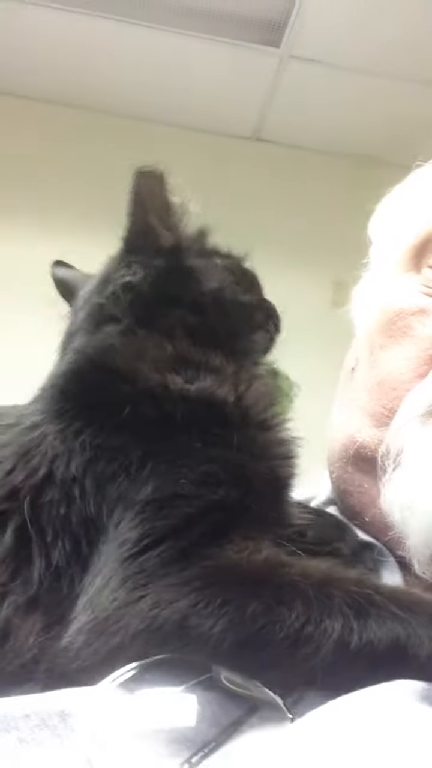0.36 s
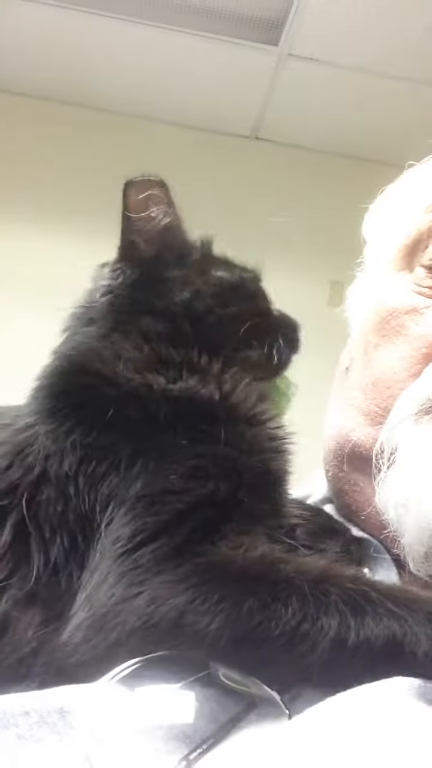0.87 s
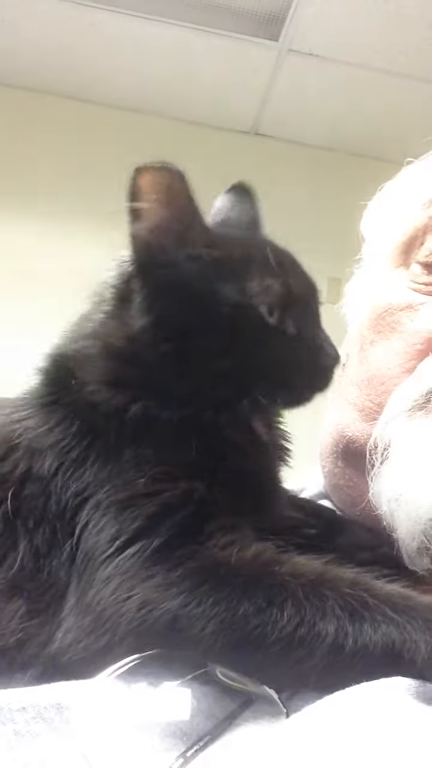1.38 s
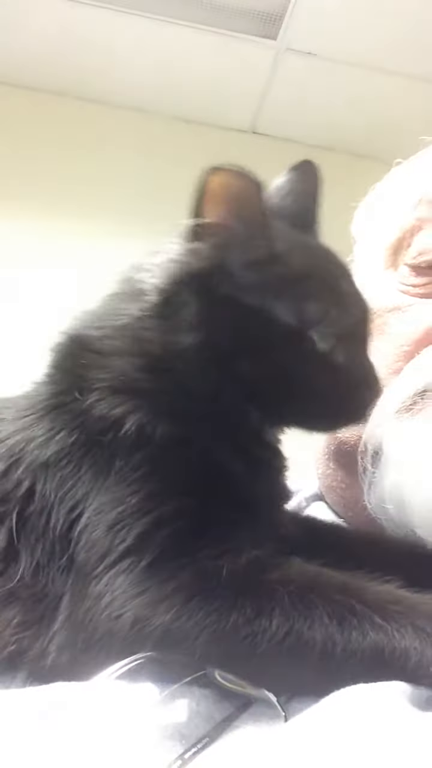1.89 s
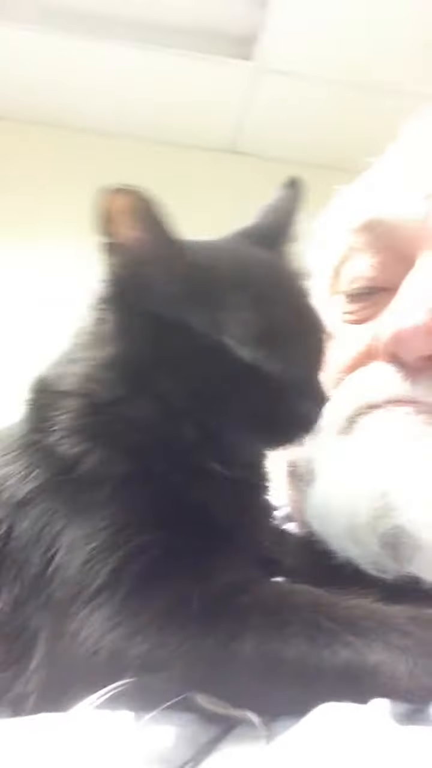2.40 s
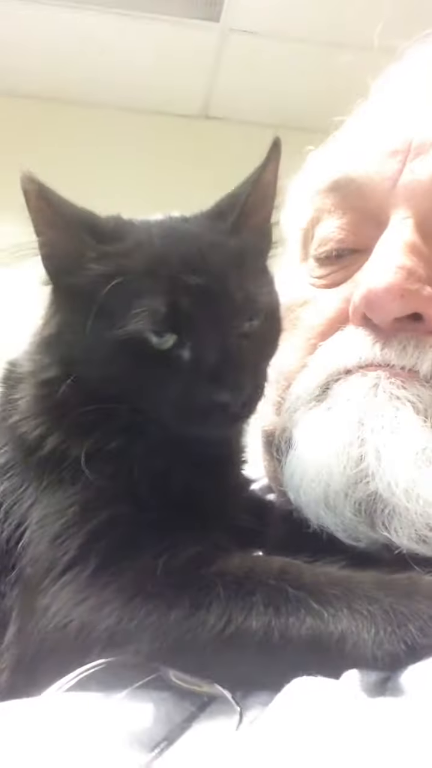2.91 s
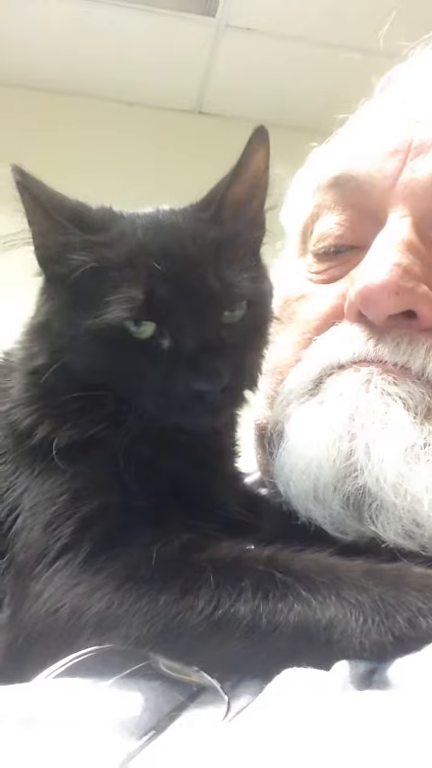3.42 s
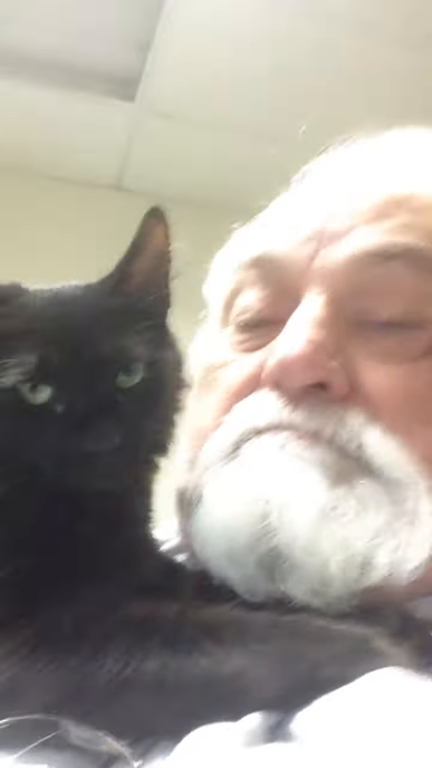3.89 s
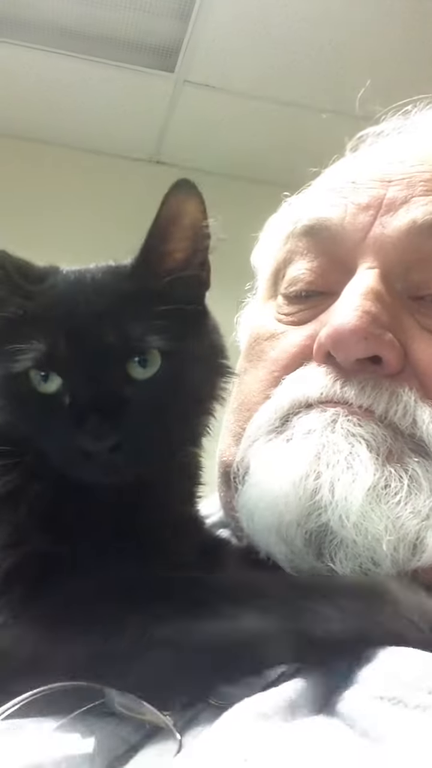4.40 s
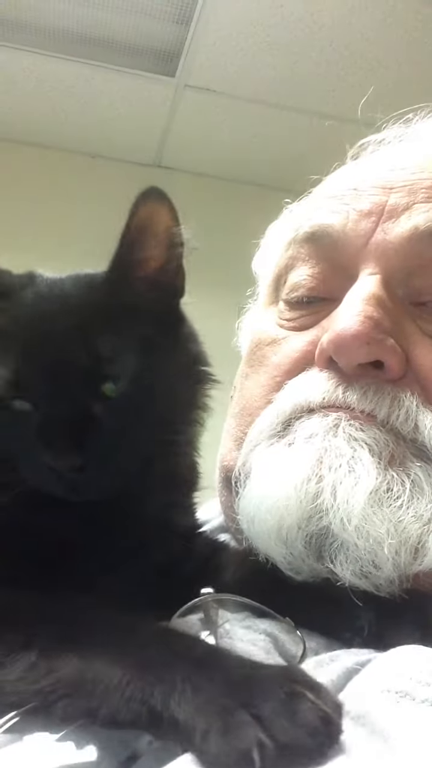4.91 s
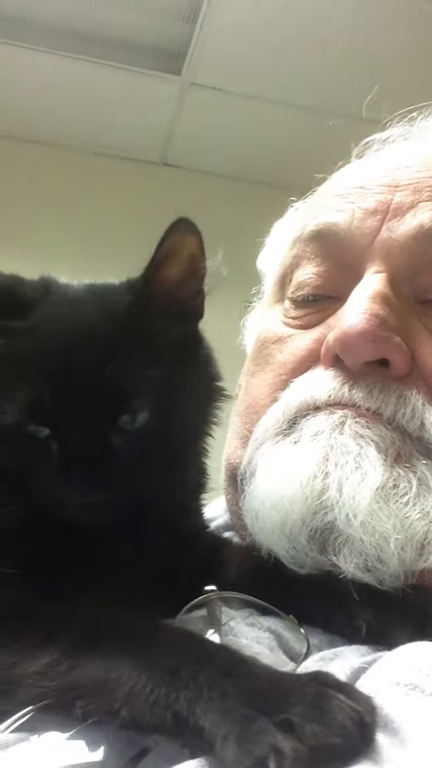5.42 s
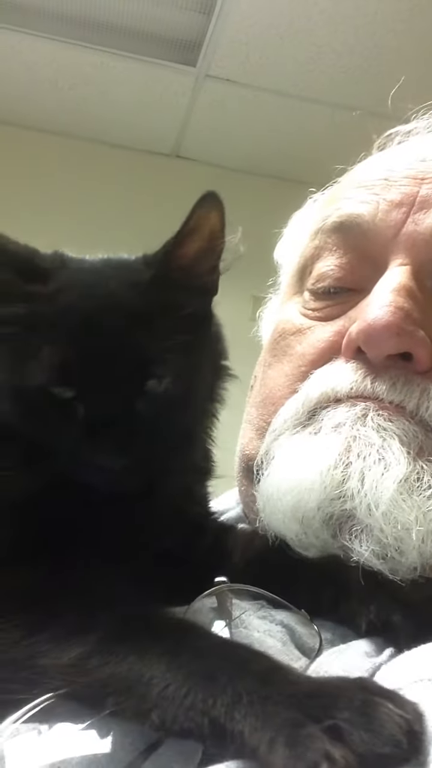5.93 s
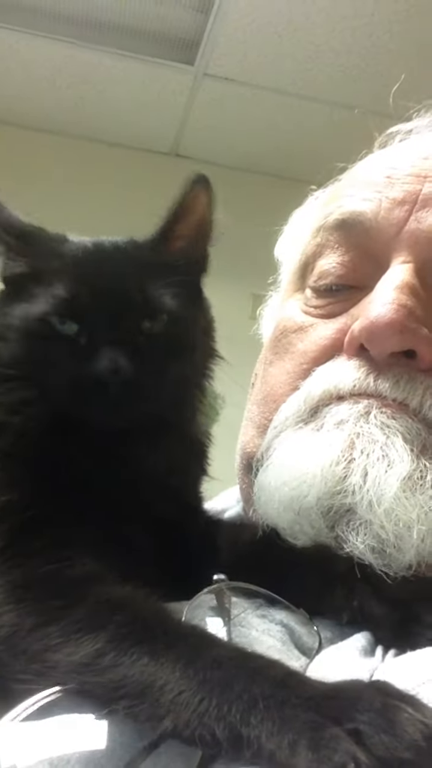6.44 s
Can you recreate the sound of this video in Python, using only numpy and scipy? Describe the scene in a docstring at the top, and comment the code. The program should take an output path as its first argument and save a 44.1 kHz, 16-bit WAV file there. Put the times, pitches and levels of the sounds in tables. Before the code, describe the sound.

A cat purrs steadily and low in a quiet room over a soft ventilation hum, with faint fur rustles and two small dry clicks midway.

```python
"""A slow machine turning 11 times a second makes a purr-like throb: each turn repeats the same gliding tone
bursts, under a steady drone. A motor hum of two beating sines and a mains buzz lie below it.
A cat on a blanket moves its head in a quiet room: fur rustles faintly (bright noise swells), with a few small
dry clicks close by (noise bursts over a hollow ring) and a thin squeak (gliding sines).
Ventilation air (shaped noise) rings the room's low modes (narrow noise bands)."""
import sys
import numpy as np
from scipy import signal
from scipy.fft import rfft, irfft
from scipy.io import wavfile

SR = 44100
rng = np.random.default_rng(int(sys.argv[2]) if len(sys.argv) > 2 else 0)


def field_ratio(decibels):
    """Amplitude ratio for a level in dB (20 dB per decade); scalars and array-likes work."""
    return 10 ** (np.asarray(decibels, dtype=float) / 20)


def put_to_file(sound):
    """Save the sound as 16-bit audio at rate SR, in the file named by the first command-line argument."""
    columns = np.atleast_2d(sound).T  # one column per channel
    safe = np.clip(columns, -1, 1)
    whole_steps = np.round(safe * 32767)
    wavfile.write(sys.argv[1], SR, whole_steps.astype(np.int16))


N = 288855


def in_time(rows):
    """A curve of (time_s, value) read at every sample."""
    return np.interp(np.arange(N) / SR, *np.transpose(rows))


def coloured_noise(gain_at):
    """White noise of 0 dB per Hz, filtered by a gain given as a function of Hz."""
    hz = np.maximum(np.arange(N // 2 + 1) * SR / N, 1)
    white = rfft(rng.standard_normal(N))
    return irfft(white * gain_at(hz), N) * np.sqrt(SR / 2)


def spectrum(points):
    """Gain along straight dB lines on a log-frequency axis."""
    hz, db = np.transpose(points)
    return lambda f: field_ratio(np.interp(np.log(f), np.log(hz), db))


def drift(corner_hz):
    """Low-passed random curve of spread 1."""
    curve = coloured_noise(lambda f: 1 / (1 + (f / corner_hz) ** 2))
    return curve / curve.std()


def tone(hz, turns=0):
    """A sine of rms 1, with a phase in turns."""
    return np.sqrt(2) * np.cos(2 * np.pi * (hz * np.arange(N) / SR + turns))


# Gliding strokes within one turn, levels before the machine gain:
# (moment_turns, pitch_hz, glide_hz_per_turn, bell_sigma_turns, peak_db)
MACHINE_STROKES = [(.522, 41.7, -27, .45, -65.8), (.118, 89.8, -53, .45, -63.7),
                   (.584, 138.9, 12, .45, -55.8), (.327, 170.3, -70, .16, -49.7),
                   (.694, 205.4, 62, .33, -50), (.122, 216.3, -238, .45, -52.2),
                   (.884, 238.9, -72, .25, -52), (.322, 292.9, -30, .45, -53.4),
                   (.863, 315.4, 53, .3, -45.9), (.173, 374.7, -98, .35, -59.4)]


def machine(waver_db):
    """Every turn repeats the same bell-shaped tone bursts, which glide in pitch and overlap the next turn."""
    turn_hz, turn_sag_hz_per_s, start_turns = 11.1898, .00077, -.002
    gain_db = 0.73
    t = np.arange(N) / SR
    turn = np.arange(2001) / 2000
    one_turn = 0
    for moment_turns, pitch_hz, glide, sigma_turns, peak_db in MACHINE_STROKES:
        nearest = (turn - moment_turns + .5) % 1 - .5
        since = nearest + np.array([[-1], [0], [1]])   # the same stroke in neighbouring turns
        bell = np.exp(-.5 * (since / sigma_turns) ** 2)
        cycles = (pitch_hz + glide * since / 2) * since / turn_hz
        one_turn = one_turn - field_ratio(peak_db) * np.sum(bell * np.cos(2 * np.pi * cycles), axis=0)
    turns = start_turns + turn_hz * t - turn_sag_hz_per_s * t ** 2 / 2
    throb = np.interp(turns % 1, turn, one_turn)
    return field_ratio(gain_db + waver_db * drift(1.3)) * throb


# Machine drone, level of the fundamental: (time_s, level_db_rms, pitch_hz)
DRONE_CURVE = [(0, -59.5, 285.51), (1.5, -59, 285.32), (3, -58.5, 285.31), (3.7, -61.5, 285.14),
               (6.55, -60.5, 285.23)]


def drone():
    """Steady tone and octave halfway between two turn partials: every second turn sounds a little different."""
    octave_db, start_turns = -19, .86
    time_s, level_db, pitch_hz = np.transpose(DRONE_CURVE)
    t = np.arange(N) / SR
    cycles = np.cumsum(np.interp(t, time_s, pitch_hz)) / SR
    pair = tone(0, cycles + start_turns) + field_ratio(octave_db) * tone(0, 2 * cycles)
    return field_ratio(np.interp(t, time_s, level_db)) * pair


# Motor hum: (time_s, level_db_rms)
HUM_CURVE = [(0, -50), (1, -49.5), (2, -49.5), (3, -50), (3.5, -52), (4, -51), (4.5, -51), (5, -49.5),
             (5.6, -49), (6.55, -48.5)]


def motor():
    """A pure low hum swells and sinks slowly; a weaker tone just below beats with it."""
    hum_hz, beat_hz, beat_db_rms = 58.73, 56.18, -66
    return field_ratio(in_time(HUM_CURVE)) * tone(hum_hz, 0.69) + field_ratio(beat_db_rms) * tone(beat_hz, 0.8)


# Mains buzz: (time_s, level_db_rms)
BUZZ_CURVE = [(0, -60.5), (1, -61), (2.6, -65), (3.5, -78), (4.1, -62), (4.5, -80), (5, -75), (6.55, -62.5)]


def mains_buzz():
    """One sine above the hum, fading in and out."""
    return field_ratio(in_time(BUZZ_CURVE)) * tone(120.1)


# Fur noise shape, relative: (freq_hz, level_db_per_hz)
FUR_SPECTRUM = [(1500, -16), (3000, 0), (6500, 0.5), (9000, -6), (14000, -5)]
# Fur brushing on cloth and hair: (peak_s, peak_db_rms, length_s)
FUR_BRUSHES = [(.15, -85, .04), (0.38, -74, .08), (1.38, -87, .06), (1.752, -81, .07), (2.025, -78, .14),
               (2.16, -79, 0.11), (2.348, -83, 0.24), (2.66, -83, 0.13), (3.05, -83, .15), (4.5, -89, .2),
               (4.85, -88, .1), (6.0, -82.5, 0.23)]


def fur(grain_db):
    """Bright noise, slightly grainy as single hairs slip; each brush swells to its peak and lets go."""
    drop_db, release_share, rest_db = 13, .8, -99   # drop_db: fall one length before the peak
    hiss = coloured_noise(spectrum(FUR_SPECTRUM)) * field_ratio(grain_db * drift(150))
    t = np.arange(N) / SR
    power = field_ratio(rest_db) ** 2
    for peak_s, peak_db, length_s in FUR_BRUSHES:
        away = (t - peak_s) / np.where(t < peak_s, length_s, release_share * length_s)
        power = power + field_ratio(peak_db - drop_db * np.minimum(away ** 2, 9)) ** 2
    return np.sqrt(power) * hiss / hiss.std()


# Hollow body ring, relative levels: (pitch_hz, level_db, t60_s)
KNOCK_MODES = [(96, -0.5, 0.07), (587, -1, 0.036), (970, -14, .03)]


def hollow_knock(t):
    """A hollow body's modes ring together, each decaying exponentially."""
    return sum(np.sin(2 * np.pi * hz * t) * field_ratio(db - 60 * t / t60_s) for hz, db, t60_s in KNOCK_MODES)


# Dry clicks; knock_db scales the hollow ring: (start_s, peak_db, low_hz, high_hz, knock_db)
DRY_CLICKS = [(3.5773, -61, 2500, 6000, -78), (3.932, -46, 1500, 18000, -43.5),
              (4.4312, -69, 9000, 15000, -90), (4.4734, -46.5, 2800, 8440, -75)]


def clicks():
    """Each click is a burst of bright noise dying in milliseconds over the short ring of a hollow body."""
    rise_s, t60_s, snap_delay_s = 0.00034, 0.01, .0004
    out = np.zeros(N)
    t = np.arange(4000) / SR
    knock = hollow_knock(t)
    for start_s, peak_db, low_hz, high_hz, knock_db in DRY_CLICKS:
        burst = rng.standard_normal(len(t)) * np.minimum(t / rise_s, 1) * field_ratio(-60 * t / t60_s)
        burst[round(snap_delay_s * SR)] = 8.5   # one sharp snap stands out of the burst
        band = signal.butter(2, [low_hz, min(high_hz, .45 * SR)], "band", fs=SR, output="sos")
        burst = signal.sosfilt(band, burst)
        start = round(start_s * SR)
        out[start:start + len(t)] += field_ratio(peak_db) * burst / abs(burst).max() - field_ratio(knock_db) * knock
    return out


# Squeak steps: (start_s, end_s, first_hz, last_hz, peak_db)
SQUEAK_STEPS = [(.865, .905, 8600, 9000, -86.5), (.912, .935, 10300, 10800, -85.5),
                (.945, .98, 11200, 11400, -86.5)]


def squeak():
    """A very faint thin whistle climbs in three steps, each a gliding sine under a half-sine swell."""
    out = np.zeros(N)
    t = np.arange(N) / SR
    for start_s, end_s, first_hz, last_hz, peak_db in SQUEAK_STEPS:
        share = np.clip((t - start_s) / (end_s - start_s), 0, 1)
        cycles = (end_s - start_s) * (first_hz * share + (last_hz - first_hz) * share ** 2 / 2)
        out += field_ratio(peak_db) * np.sin(np.pi * share) * np.sin(2 * np.pi * cycles)
    return out


# Room modes, levels before the flutter: (center_hz, width_hz, level_db_rms)
MODES = [(113, 4.6, -67.5), (118.8, 2.7, -72.5), (148, 4.3, -66.5), (177.6, 17, -60.5), (219.1, 6.7, -61.5),
         (277.2, 6, -68.5), (373, 13, -72.5), (438, 17, -80), (516, 25, -77.5), (655.6, 16, -76.5),
         (738, 30, -80.5), (842, 33, -83.5), (1060, 30, -86.5), (1165, 30, -83), (1326, 100, -81.5),
         (1569, 82, -81.5), (1916, 40, -83), (2450, 400, -86), (3580, 360, -92), (3850, 40, -96),
         (4780, 27, -101)]


def room_modes():
    """Air noise rings each narrow room mode: noise under a bell of full width at half amplitude."""
    out = np.zeros(N)
    for center_hz, width_hz, level_db in MODES:
        mode = coloured_noise(lambda f: 1 / (1 + (2 * (f - center_hz) / width_hz) ** 2))
        out += field_ratio(level_db) * mode / np.sqrt(np.pi * width_hz / 4)   # bell power: pi / 4 of its width
    return out


# Ventilation air and microphone hiss, before the flutter: (freq_hz, level_db_per_hz)
AIR_SPECTRUM = [(20, -91), (35, -90), (50, -78), (100, -85.5), (200, -83), (350, -87.5), (600, -90.5),
                (950, -95.5), (1080, -102), (1500, -101), (2300, -103.5), (2650, -106), (3300, -114),
                (4200, -115), (5300, -118.5), (7800, -120), (8500, -125), (10000, -127.3), (15000, -126.7)]


def air(flutter_db):
    """Broad air noise plus the room modes; turbulence makes the upper part flutter."""
    steady = coloured_noise(spectrum(AIR_SPECTRUM)) + room_modes()
    band = signal.butter(2, [900, 4500], "band", fs=SR, output="sos")
    upper = signal.sosfiltfilt(band, steady)
    return steady + upper * (field_ratio(flutter_db * drift(16)) - 1)


def scene():
    """All sources reach the one microphone."""
    throb = machine(waver_db=0.48) + drone()
    low_tones = motor() + mains_buzz()
    close = fur(grain_db=2.0) + clicks() + squeak()
    return (throb + low_tones + close + air(flutter_db=1.05))[None]


def top_cut(x):
    """Nothing passes above the cut-off."""
    return signal.sosfilt(signal.butter(12, 15600, fs=SR, output="sos"), x)


def record(dry):
    """A steep elliptic low-pass cuts the top above 15.2 kHz."""
    low_pass = signal.ellip(10, .5, 60, 15200, fs=SR, output="sos")
    mix = signal.sosfilt(low_pass, dry)
    return top_cut(mix)


dry = scene()
out = record(dry)
put_to_file(out)
```